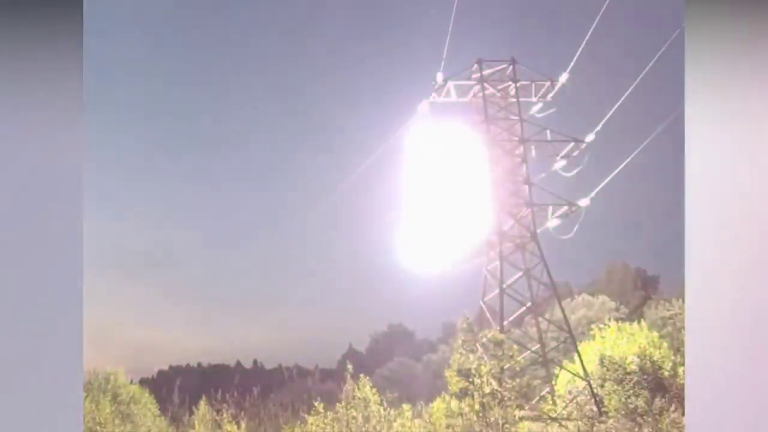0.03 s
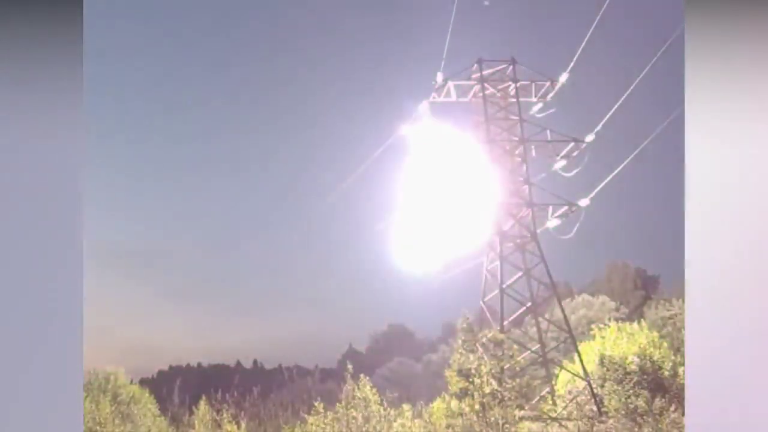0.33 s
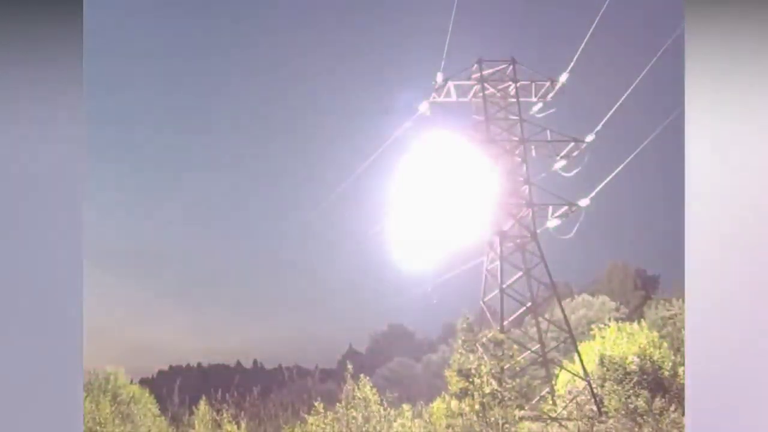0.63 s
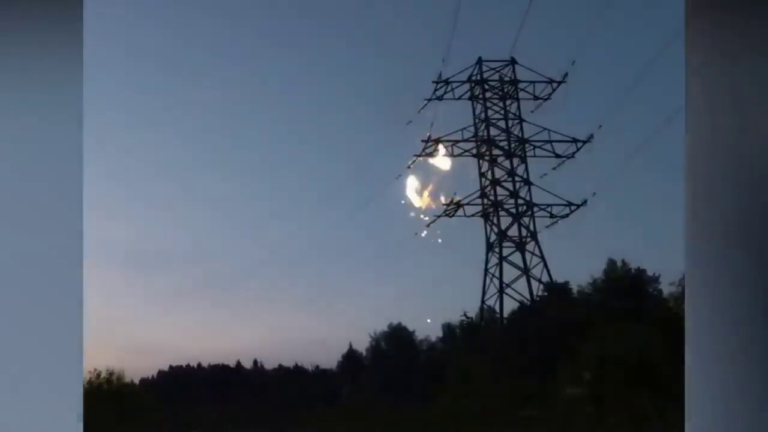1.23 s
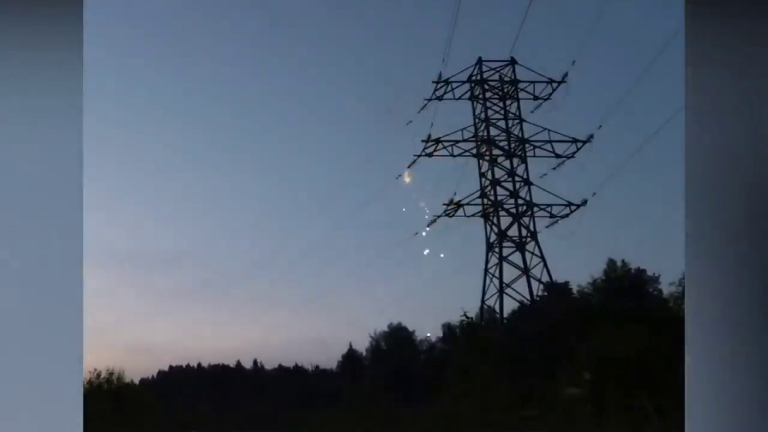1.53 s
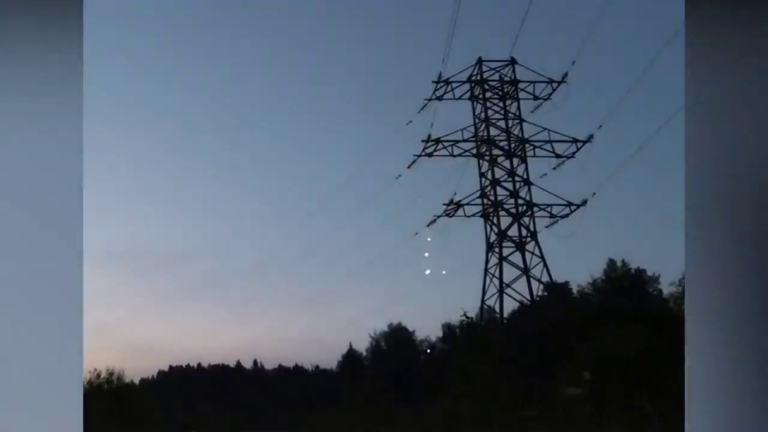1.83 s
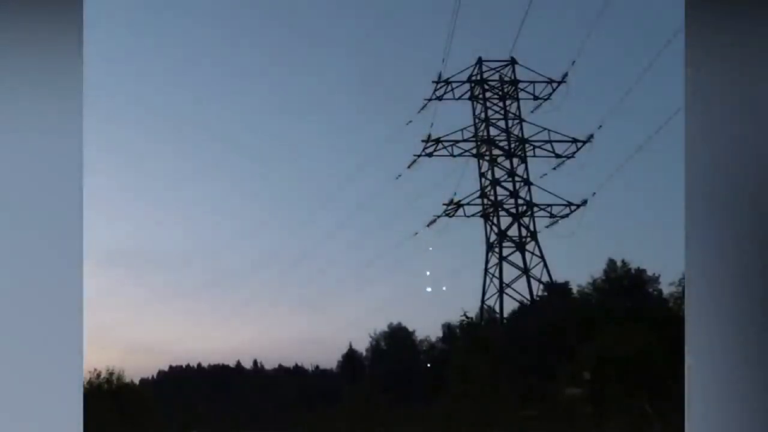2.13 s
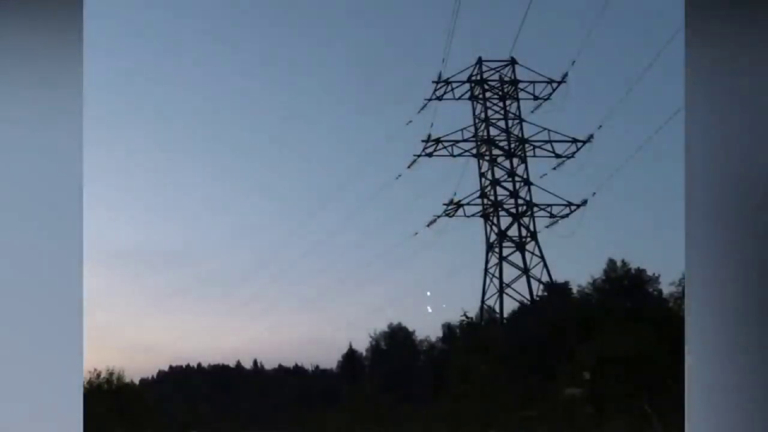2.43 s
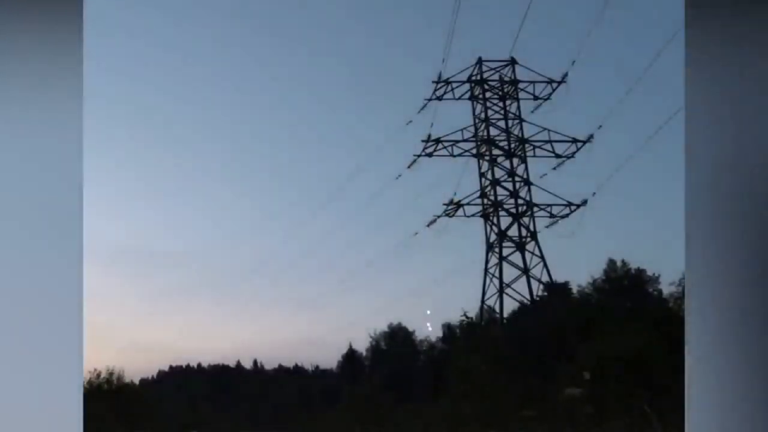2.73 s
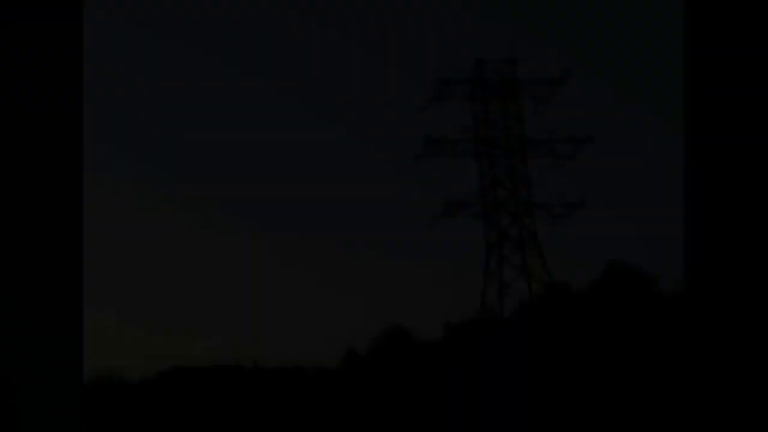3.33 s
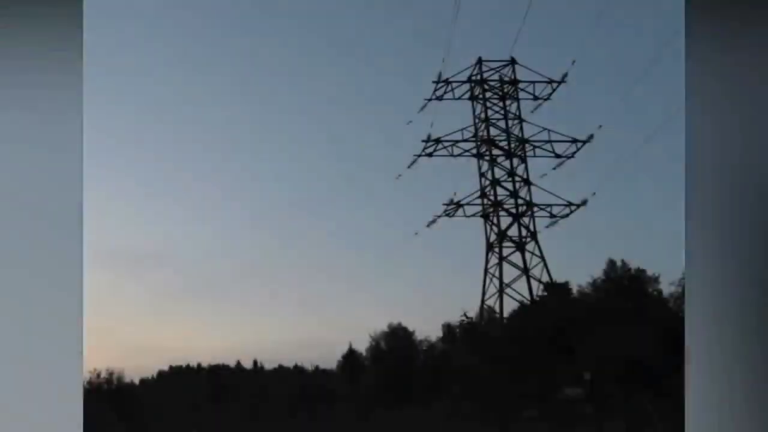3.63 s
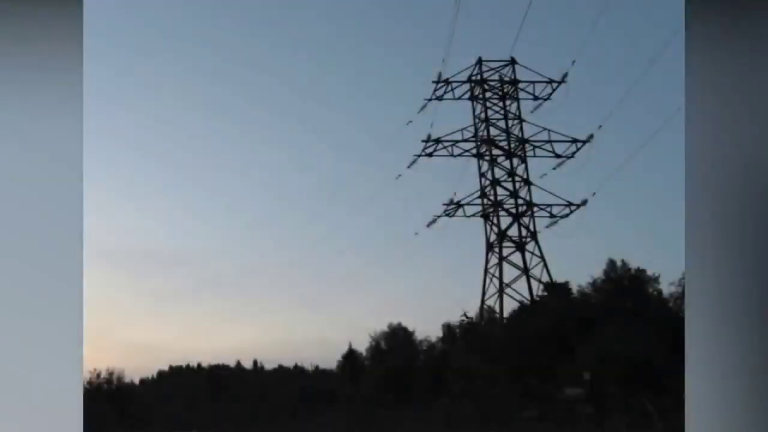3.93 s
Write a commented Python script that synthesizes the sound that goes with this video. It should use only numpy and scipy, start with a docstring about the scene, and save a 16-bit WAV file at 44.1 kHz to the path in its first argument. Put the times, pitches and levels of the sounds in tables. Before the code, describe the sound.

Loud electrical arcing outdoors on a pylon gives a distorted buzz and ragged crackle, then stops suddenly. Its echo fades across trees and hills under a soft hiss, cutting to a short, quiet rumble and silence.

```python
"""A power arc burns on a pylon: its hot channel swells with each current peak, making a 100 Hz buzz,
a ragged roar of small shock waves and sharp cracks that overload the microphone.
It goes out after about a second; its roar rolls back from the forest and its hum from the hills,
under a faint swelling hiss. The sound cuts to a short, dull rumble with no treble, then silence."""
import sys
import numpy as np
from scipy import signal
from scipy.fft import rfft, irfft
from scipy.io import wavfile

SR = 44100
rng = np.random.default_rng(int(sys.argv[2]) if len(sys.argv) > 2 else 0)


def int16_out(signal):
    """Quantize to a 16-bit WAV file."""
    q = np.round(np.clip(np.atleast_2d(signal).T, -1, 1) * 32767)
    wavfile.write(sys.argv[1], SR, q.astype(np.int16))


N = 176400
T = np.arange(N) / SR
FREQS = np.maximum(np.arange(N // 2 + 1) * SR / N, 1)
BUZZ_HZ = 100
ARC_OUT_S, RUMBLE_FROM_S, RUMBLE_TO_S = 1.177, 3.43, 3.865


def from_db(db):
    """Decibels to gain."""
    return 10 ** (np.asarray(db) / 20)


def unit_rms(x):
    """Scale to unit rms."""
    return x / np.sqrt(np.mean(x ** 2) + 1e-20)


def over_time(rows):
    """Each column of an automation curve at every sample."""
    times_s, *columns = np.transpose(rows)
    return [np.interp(T, times_s, column) for column in columns]


def over_frequency(rows):
    """A curve read on a log-frequency axis."""
    hz, value = np.transpose(rows)
    return np.interp(np.log(FREQS), np.log(hz), value)


def gate(start_s, end_s, fade_s=.01):
    """A gate with short ramps."""
    return np.clip((T - start_s) / fade_s + .5, 0, 1) * np.clip((end_s - T) / fade_s + .5, 0, 1)


def colour(x, eq):
    """EQ a flat signal, keeping its power; minimum phase, so fronts stay steep."""
    gain = unit_rms(from_db(over_frequency(eq)))
    cepstrum = irfft(np.log(gain), N)
    cepstrum[1:N // 2] *= 2
    cepstrum[N // 2 + 1:] = 0
    return irfft(rfft(x) * np.exp(rfft(cepstrum)), N)


def drift(rate_hz):
    """A random wobble of unit rms, mostly slower than rate_hz."""
    return unit_rms(irfft(rfft(rng.standard_normal(N)) / (1 + (FREQS / rate_hz) ** 4), N))


def widen(pair, likeness):
    """Two unrelated signals become left and right: likeness 1 is mono, 0 is fully wide."""
    alike = np.clip(over_frequency(likeness), 0, 1)
    mid, side = rfft(pair)
    return irfft(np.sqrt((1 + alike) / 2) * mid + np.sqrt((1 - alike) / 2) * side * [[1], [-1]], N)


def partial(cycles, harmonic, waver, rate_hz, width=0):
    """One harmonic wavering in level and phase; width lets left and right waver apart."""
    def wobble():
        shared = np.sqrt(1 - width) * drift(rate_hz)
        return shared + np.sqrt(width) * np.array([drift(rate_hz), drift(rate_hz)])

    phase = 2 * np.pi * harmonic * cycles
    tone = (1 + waver * wobble()) * np.sin(phase) + waver * wobble() * np.cos(phase)
    return tone / np.sqrt(1 + 2 * waver ** 2)


# Stereo image of the noise: frequency_hz, likeness (0-1)
NOISE_IMAGE = [(150, 1), (400, 1), (950, 0.74), (2400, .75), (6000, 0.17), (15000, .2)]
def stereo_noise():
    """White noise, centred in the bass and wide in the treble."""
    return widen(rng.standard_normal((2, N)), NOISE_IMAGE)


# Stereo image of the shocks: frequency_hz, likeness (0-1)
SHOCK_IMAGE = [(150, .95), (280, 0.1), (450, 0.5), (750, 0.8), (1300, .68), (2400, 0.6), (6000, 0.4),
               (15000, .15)]
def shocks(per_s, spread_db):
    """A stereo spray of tiny shock waves, uneven in size and timing."""
    sizes = from_db(spread_db * np.minimum(rng.exponential(1, (2, N)), 4))
    signs = rng.choice([-1, 1], (2, N))
    hits = rng.random((2, N)) < per_s / SR
    return widen(unit_rms(sizes * signs * hits), SHOCK_IMAGE)


# Fader ride of the hiss: time_s, relative_level_db
HISS_RIDE = [(1.2, -60), (1.6, -52.5), (1.8, -56.5), (1.97, -51), (2.03, -56.5), (2.28, -58), (2.45, -53.5),
             (2.53, -53.5), (2.575, -51), (2.63, -55.5), (3.08, -56), (3.25, -59.5), (3.42, -58)]
# Tone of the hiss: frequency_hz, relative_gain_db
HISS_EQ = [(30, -24), (70, -15.5), (130, -11.5), (1000, 5.5), (2500, 0), (5200, -1), (7000, -4),
           (15000, -6)]
def hiss():
    """A faint grainy bed that swells and sinks until the rumble takes over."""
    ride_db, = over_time(HISS_RIDE)
    grains = colour(shocks(per_s=7000, spread_db=2.5), HISS_EQ)
    return from_db(ride_db + 5.5) * grains * gate(0, RUMBLE_FROM_S)


# Tone of the rumble: frequency_hz, relative_gain_db
RUMBLE_EQ = [(25, -3.5), (60, -4.5), (170, 3.5), (320, -1), (600, -3), (1000, -5), (2000, -11), (3000, -12)]
def closing_rumble():
    """A short, dull rumble with no treble."""
    level_db, right_lift_db, top_hz = -44.5, .5, 3060
    rumble = irfft(rfft(colour(stereo_noise(), RUMBLE_EQ)) * (FREQS < top_hz), N)
    return from_db([[level_db], [level_db + right_lift_db]]) * rumble * gate(RUMBLE_FROM_S, RUMBLE_TO_S)


# Relative fader rides of the echoing harmonics: time_s, first_db, second_db, third_db
HUM_RIDES = [(1.24, -46, -47, -52), (1.36, -40, -46.5, -50), (1.48, -48, -67, -47), (1.6, -65, -55, -64),
             (1.8, -55, -55, -50), (1.92, -67, -66.5, -57), (2.07, -57, -47.5, -68), (2.16, -54, -66, -61),
             (2.36, -69, -58, -50), (2.46, -57, -60, -53), (2.49, -59, -71, -59), (2.82, -62, -54, -59.5),
             (2.92, -65, -84, -53), (2.94, -65, -72, -59), (3.21, -60, -69, -73), (3.25, -61, -77, -63),
             (3.35, -73.5, -65, -69), (3.42, -66, -63.5, -76)]
def hum_echo():
    """The hills throw back the low buzz harmonics in slow swells."""
    first_db, second_db, third_db = over_time(HUM_RIDES)
    rides = [(1, first_db), (2, second_db), (3, third_db), (5, third_db - 13.5)]
    hum = sum(from_db(ride_db + 7) * partial(BUZZ_HZ * T, harmonic, waver=.18 * harmonic, rate_hz=5)
              for harmonic, ride_db in rides)
    return np.sqrt(2) * hum * gate(ARC_OUT_S, RUMBLE_FROM_S)


# Tone of the forest echo before it decays: frequency_hz, relative_gain_db
FOREST_EQ = [(30, -40.5), (70, -24.5), (130, -16.5), (250, -11.5), (450, -3.5), (900, -4.5), (1500, -12),
             (3000, -18), (6000, -26), (15000, -34.5)]
def forest_echo():
    """The roar scatters back from near trees and far woods; the air takes the treble first."""
    near_db_per_s, far_db_per_s, air_db_per_s_khz = 23.5, 5, 8
    age_s = np.maximum(T - ARC_OUT_S, 0)
    near = from_db(-25.5 - near_db_per_s * age_s)
    far = from_db(-32 - far_db_per_s * age_s)
    spectrum = rfft(colour(stereo_noise(), FOREST_EQ))
    edges_hz = np.geomspace(20, 16000, 18)
    tail = 0
    for low, high in zip(edges_hz, edges_hz[1:]):
        band = irfft(spectrum * (FREQS >= low) * (FREQS < high), N)
        loss_db = air_db_per_s_khz * np.sqrt(low * high) / 1000 * age_s
        flutter_db = 1.4 * drift(rate_hz=9.6)
        tail += band * from_db(flutter_db - loss_db)
    return np.hypot(near, far) * tail * gate(-1, RUMBLE_FROM_S)


# Cue list of the cracks: start_s, relative_level_db, hold_s
CRACK_CUES = [(0.0226, -6.5, .003), (.1002, 3, .0015), (.110, -8, .003), (0.129, -11, .002),
              (.1422, -3.5, .0025), (.179, 2, .0045), (.2035, -5, .002), (0.3595, -2.5, 0.0034),
              (.4553, 4.5, .002), (0.458, -8.5, .005), (0.481, -7, 0.0017), (0.557, -7, 0.0047),
              (.5875, -1, 0.0013), (.6405, 2, .003), (.7118, 2.5, .002), (.7522, -3.5, .003),
              (.832, -0.5, .003), (.9043, -1, 0.0024), (.914, 1.5, .003), (.938, -15, .006),
              (.9577, -4, 0.0045), (.969, -9.5, .005), (1.042, -28.5, 0.0035), (1.0825, -5, .002),
              (1.128, -12.5, .005)]
# Tone of the cracks: frequency_hz, relative_gain_db
CRACK_EQ = [(60, -12.5), (300, 2), (900, 9), (1800, 1), (3500, -2), (5500, -4), (8500, -7), (11000, -11.5),
            (15000, -16)]
def cracks():
    """Each crack is a dense volley of shocks that holds and drops, trailed by a thinner sizzle."""
    release_s, sizzle_decay_s = .001, .035
    volley_power, sizzle_power = np.zeros(N), np.zeros(N)
    for start_s, level_db, hold_s in CRACK_CUES:
        age_s = np.maximum(T - start_s, 0)
        power = (T >= start_s) * from_db(level_db) ** 2
        volley_power += power * np.exp(-2 * np.maximum(age_s - hold_s, 0) / release_s)
        sizzle_power += power * np.exp(-2 * age_s / sizzle_decay_s)
    volley = np.sqrt(volley_power) * shocks(per_s=15000, spread_db=2)
    sizzle = from_db(-8) * np.sqrt(sizzle_power) * shocks(per_s=9000, spread_db=5)
    return from_db(-5) * colour(volley + sizzle, CRACK_EQ)


def pressure_fronts(cycles, gain_db, jitter_s, spread_db):
    """One steep pressure front per cycle, uneven in strength and timing."""
    decay_s, band_hz = .0013, [200, 3470]
    starts_s = T[1:][np.diff(np.floor(cycles)) > 0]
    jitter, size = rng.standard_normal((2, 500))[:, :len(starts_s)]
    onsets = np.clip((starts_s + jitter_s * jitter) * SR, 0, N - 1).astype(int)
    clicks = np.zeros(N)
    clicks[onsets] = from_db(gain_db + spread_db * size)
    fronts = signal.lfilter([1], [1, -np.exp(-1 / (decay_s * SR))], clicks)
    return signal.sosfilt(signal.butter(1, band_hz, "band", fs=SR, output="sos"), fronts)


def strikes(cycles):
    """The pressure leaps at each re-ignition and drops as the channel collapses later in the cycle."""
    ignition = pressure_fronts(cycles, gain_db=-3, jitter_s=.0002, spread_db=2.5)
    collapse = pressure_fronts(cycles - .41, gain_db=-6, jitter_s=.00035, spread_db=4.5)
    return ignition - collapse


# Vigour of the burning arc: time_s, relative_level_db
ROAR_RIDE = [(0, 2.5), (.08, -1), (.17, -3), (.25, 0.5), (.43, 0.5), (.55, -1), (.63, 0), (.75, -0.5),
             (.93, 1), (1.05, 0), (1.13, -10)]
# Tone of the roar: frequency_hz, relative_gain_db
ROAR_EQ = [(25, -22.5), (60, -13), (160, -15), (260, -6.5), (380, 1.5), (550, -4), (750, -3.5), (1100, -8),
           (1600, -14.5), (3000, -21), (6000, -28), (10000, -31.5), (15000, -44)]
def roar(cycles):
    """Small shocks pulse with the current and sputter along with the strikes until the arc goes out."""
    pulse_depth_db, dying_db_per_s = 1, 330
    pulsing = unit_rms(from_db(pulse_depth_db * np.cos(2 * np.pi * cycles - np.pi / 8)))
    spray = colour(shocks(per_s=3500, spread_db=3.5) * pulsing, ROAR_EQ)
    body = from_db(-9.5) * spray + strikes(cycles)
    ride_db, = over_time(ROAR_RIDE)
    dying_db = dying_db_per_s * np.maximum(T - ARC_OUT_S, 0)
    sputter_db = 1.6 * drift(rate_hz=40)
    return body * from_db(ride_db - dying_db + sputter_db)


# Partials of the buzz: harmonic, relative_level_db, waver_depth
BUZZ_PARTIALS = [(1, -2, .04), (2, -24.5, .8), (3, -20, 0.37), (4, -20.5, 0.62), (5, -16.5, 0.52),
                 (7, -27.5, 0.57)]
def buzz(cycles):
    """The hot channel swells with each current peak: a mains buzz that fades as the arc dies."""
    fade_from_s, fade_s = 1.105, .061
    tone = sum(from_db(level_db) * partial(cycles, harmonic, waver, rate_hz=9.6, width=.42)
               for harmonic, level_db, waver in BUZZ_PARTIALS)
    return tone * np.exp(-(np.maximum(T - fade_from_s, 0) / fade_s) ** 2)


# Jumps of the arc to a longer path: time_s, lag_cycles
PATH_JUMPS = [(.182, .08), (.458, .17), (.641, .09), (.76, .03), (.958, .05)]
def arc():
    """Buzz and roar share one pulse; at each jump it falls behind and the buzz sags."""
    first_strike_s, jump_s, sag_db_per_cycle = .0066, .018, 21
    cycles, sag_db = BUZZ_HZ * (T - first_strike_s), np.zeros(N)
    for time_s, lag_cycles in PATH_JUMPS:
        progress = (T - time_s) / jump_s
        cycles -= lag_cycles * np.clip(progress + .5, 0, 1)
        sag_db += sag_db_per_cycle * lag_cycles * np.exp(-(progress - .5) ** 2)
    return buzz(cycles) * from_db(-sag_db) + roar(cycles)


# Trim on the right channel: frequency_hz, gain_db
RIGHT_TRIM = [(100, -7), (300, -6), (640, -8), (1400, -5.5), (3100, -3), (7000, -3), (15000, -0.5)]
def scene():
    """The full mix, leaning left; silence after the rumble."""
    left, right = arc() + cracks() + forest_echo() + hum_echo() + hiss() + closing_rumble()
    right = irfft(rfft(right) * from_db(over_frequency(RIGHT_TRIM)), N)
    return np.array([left, right]) * gate(-1, RUMBLE_TO_S)


def record(dry):
    """The microphone overloads and flattens the peaks; a steep low-pass cuts the top."""
    knee, cutoff_hz = 5.6, 15200
    clipped = dry / (1 + np.abs(dry) ** knee) ** (1 / knee)
    return signal.sosfilt(signal.ellip(10, .1, 70, cutoff_hz, fs=SR, output="sos"), clipped)


dry = scene()
out = record(dry)
int16_out(out)
```